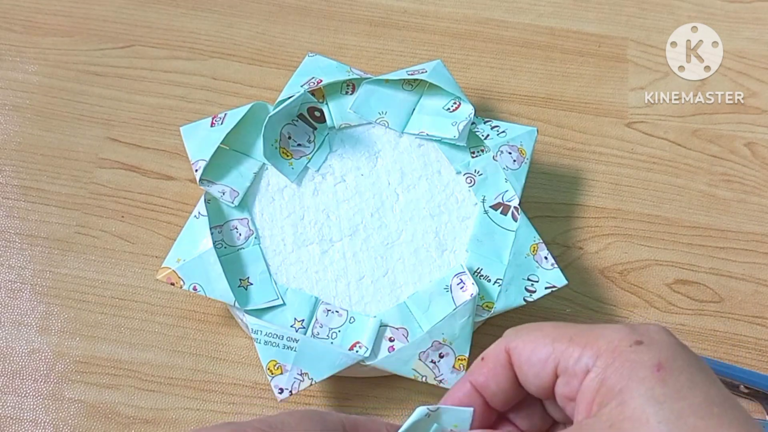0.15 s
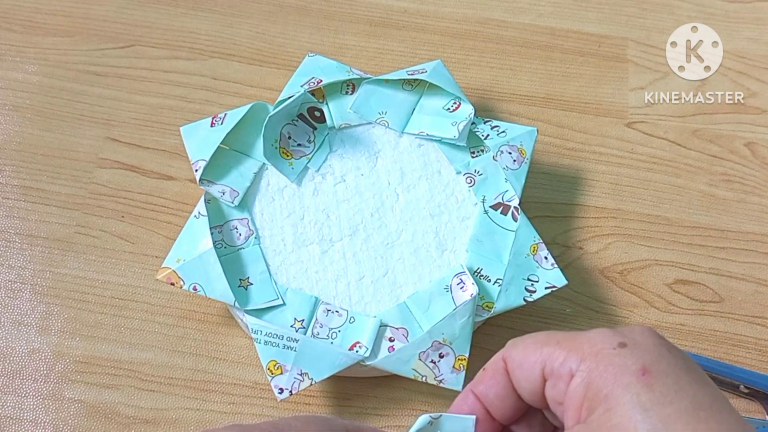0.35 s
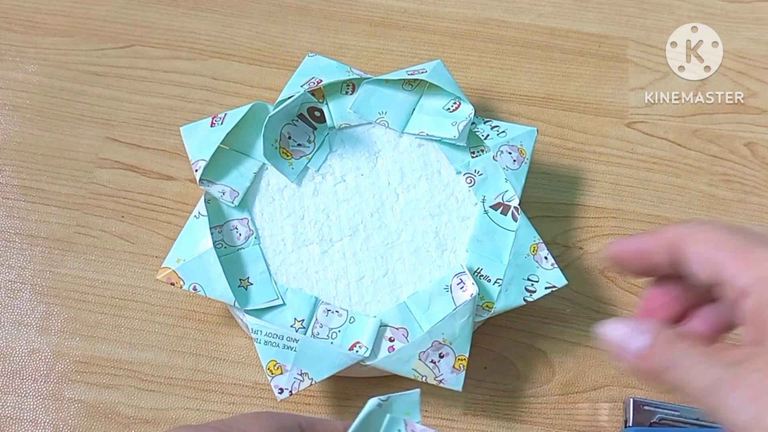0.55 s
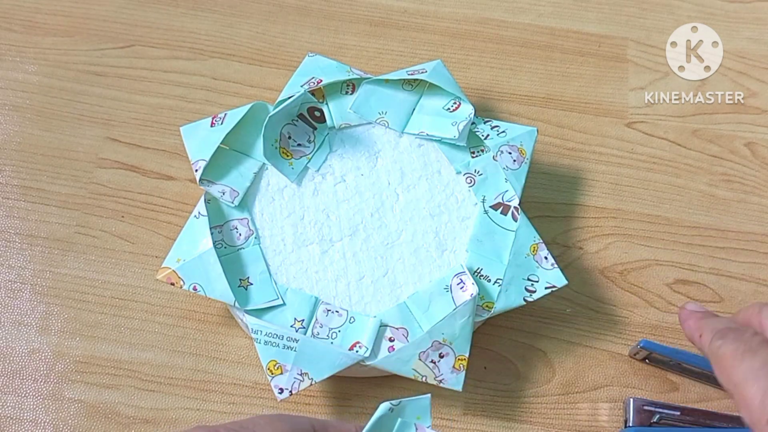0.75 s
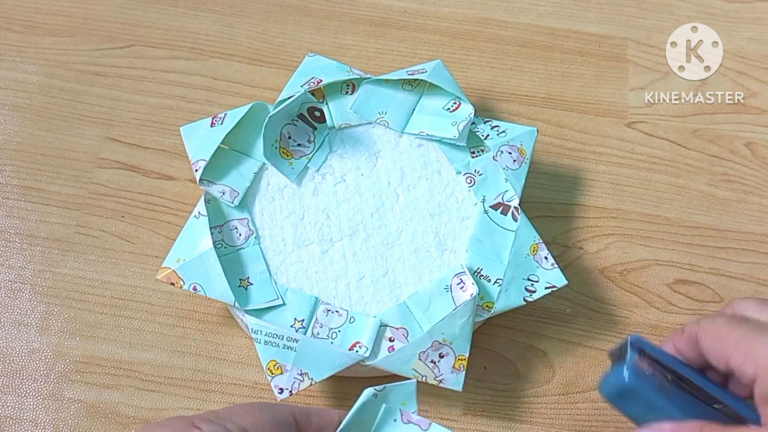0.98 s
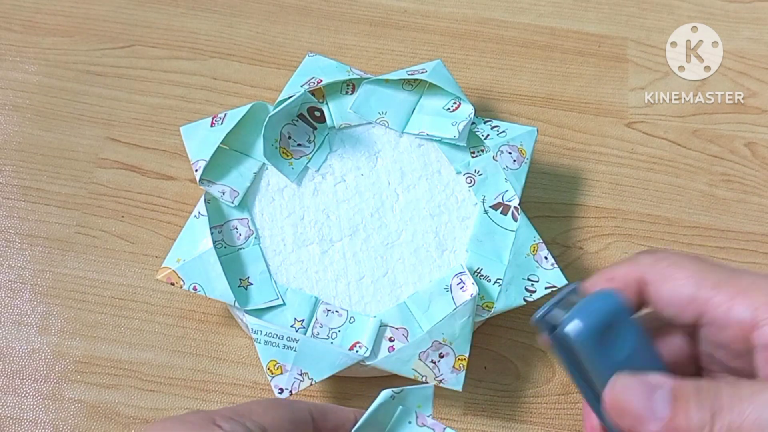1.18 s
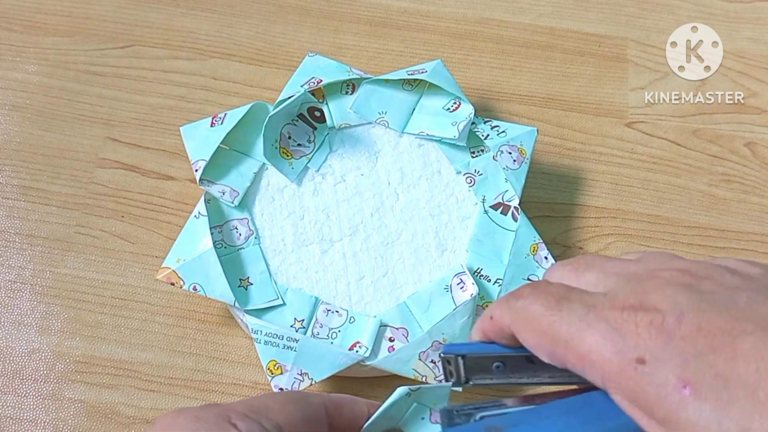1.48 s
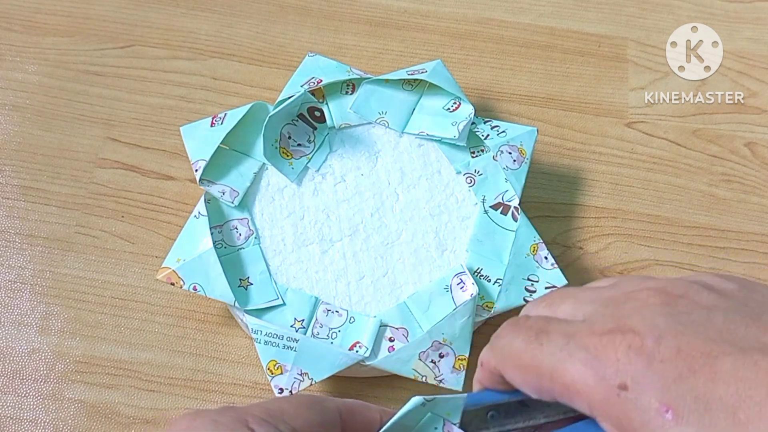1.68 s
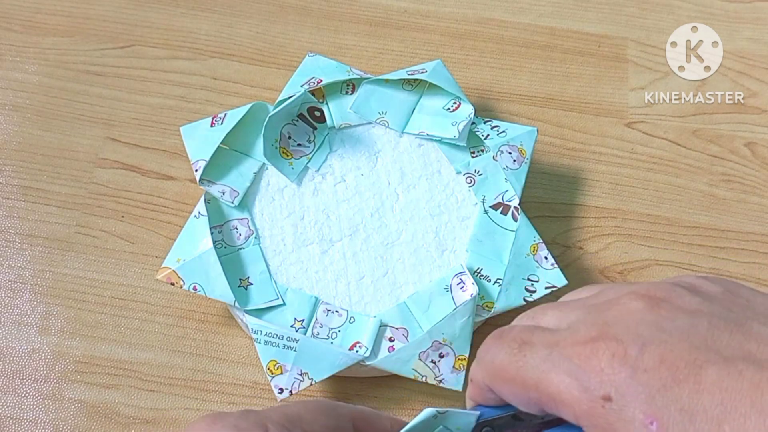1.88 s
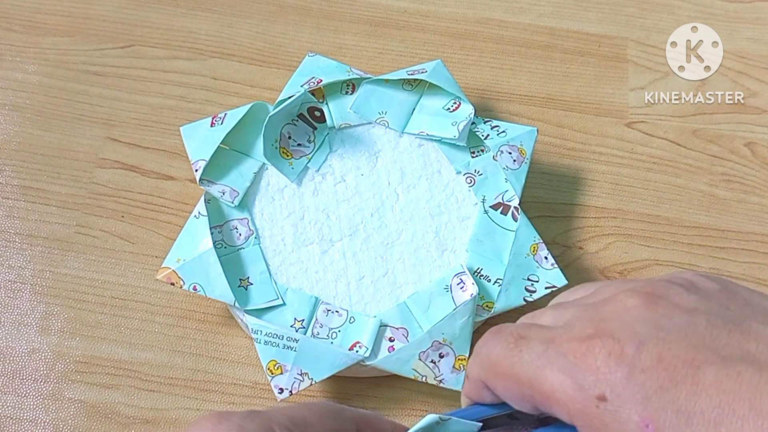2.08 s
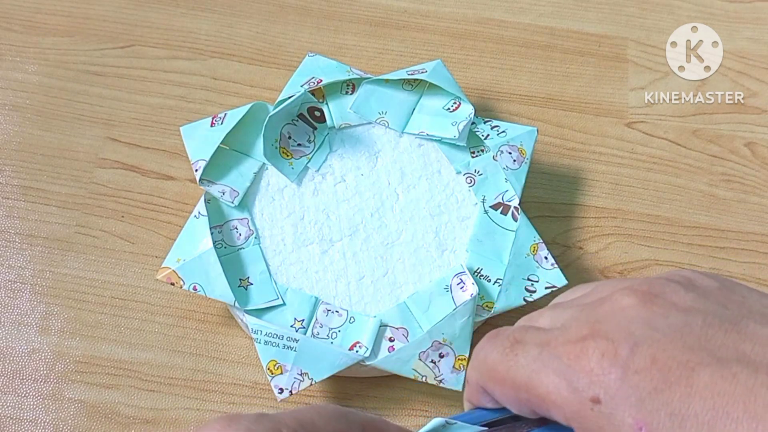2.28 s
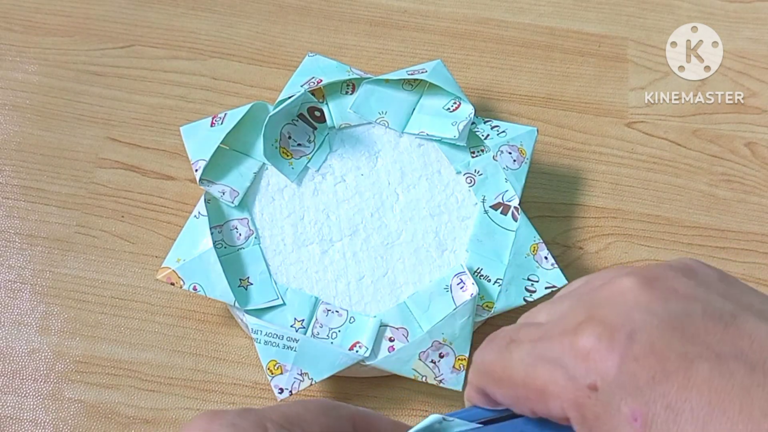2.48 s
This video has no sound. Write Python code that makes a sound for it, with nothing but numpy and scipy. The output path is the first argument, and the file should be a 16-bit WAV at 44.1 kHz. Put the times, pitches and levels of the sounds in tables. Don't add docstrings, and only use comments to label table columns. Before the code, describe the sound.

Stapler press and release, close and sharp, late in the scene; before it, light knocks, a brief paper rustle and sliding paper; afterwards small ticks, over low hum and faint hiss in a reverberant room.

```python
import sys
import numpy as np
from scipy import signal
from scipy.fft import rfft, irfft
from scipy.io import wavfile
from scipy.ndimage import uniform_filter1d

SR = 44100
rng = np.random.default_rng(int(sys.argv[2]) if len(sys.argv) > 2 else 0)


def attenuation_scalar(level_db):
    decades = np.asarray(level_db, float) / 20
    return 10 ** decades


def output_pcm(signal):
    pcm = np.clip(np.atleast_2d(signal).T, -1, 1) * 32767
    wavfile.write(sys.argv[1], SR, np.round(pcm).astype(np.int16))


N = 116865
EDGE_HZ = 15600


def evened(x):
    return x / np.sqrt(np.mean(x ** 2) + 1e-20)


def slow_noise(n, width):
    once = uniform_filter1d(rng.standard_normal(n), size=width)
    return evened(uniform_filter1d(once, size=width))


def read(points, hz):
    f, value = np.transpose(points)
    return np.interp(np.log(hz + 1), np.log(f + 1), value)


def level(points):
    s, db = np.transpose(points)
    after = db[-1] if s[-1] > 2.6 else -140
    return attenuation_scalar(np.interp(np.arange(N) / SR, s, db, left=-140, right=after))


def add(mix, s, sound):
    part = mix[..., round(s * SR):][..., :sound.shape[-1]]
    part += sound[..., :part.shape[-1]]


def colour(x, db_of):
    gain_db = np.maximum(db_of(np.fft.rfftfreq(4096, 1 / SR)), -100)
    cepstrum = irfft(np.log(attenuation_scalar(gain_db)))
    cepstrum[1:2048] *= 2
    cepstrum[2049:] = 0
    response = irfft(np.exp(rfft(cepstrum)))[:2048]
    return signal.oaconvolve(x, response)[:len(x)]


def resonate(x, peaks):
    total = 0
    for k, (hz, width, db) in enumerate(peaks):
        total = total + (-1) ** k * attenuation_scalar(db) * signal.lfilter(*signal.iirpeak(hz, hz / width, SR), x)
    return total


def burst(shape):
    x = rng.standard_normal(len(shape)) * shape
    for _ in range(4):
        z = rfft(x)
        x = irfft(z / abs(z), len(x))
        x = x * shape / np.sqrt(uniform_filter1d(x ** 2, size=25) + 1e-20)
    return x


def direct_and_room(sound, db, room_db, far=None):
    send = sound if far is None else far
    return np.array([sound, send]) / abs(sound).max() * attenuation_scalar([[db], [db + room_db]])


def snap(s, db, length, rise, room_db, modes, spectrum):
    t = np.arange(2000) / SR
    fade = attenuation_scalar(-60 * np.maximum(t - length, 0) / 0.014)
    rattle = burst(np.minimum(t / rise, 1) * fade)
    crack = evened(colour(rattle, lambda hz: read(spectrum, hz)))
    body = evened(resonate(rattle, modes))
    return s - rise / 2, direct_and_room(body + attenuation_scalar(-8) * crack, db, room_db, crack + attenuation_scalar(1) * body)


# (time [s], peak level [dB], rattle length [s], rise [s], room level [dB])
SNAPS = [
    (1.9895, -1, 0.0043, 0.00017, -7),
    (2.2445, -5.5, 0.0012, 0.00074, -13),
]
# (frequency [Hz], width [Hz], level [dB])
PRESS_MODES = [(580, 140, -13.5), (715, 100, -4), (2020, 275, 2.5), (3171, 77, 5.5), (4345, 180, -1.5),
               (5330, 310, 3), (6430, 860, -6.5), (8655, 440, 5), (10610, 760, 4), (10650, 250, -4.5)]
# (frequency [Hz], width [Hz], level [dB])
RELEASE_MODES = [(928, 110, -9), (1664, 330, -8.5), (2436, 105, 5), (3294, 187, 1), (3716, 270, -3),
                 (4100, 140, 0.5), (5620, 240, -5.5), (6250, 230, -1.5), (9350, 1200, -4),
                 (10700, 1170, -1.5)]
# (frequency [Hz], level [dB])
PRESS_CRACK = [(250, -41.5), (400, -13), (700, -1.5), (1310, -36), (1990, -0.5), (3500, 0), (10200, -10),
               (15500, -7)]
# (frequency [Hz], level [dB])
RELEASE_CRACK = [(500, -65), (740, -35.5), (980, -17), (2100, -15), (3500, 5.5), (4700, -18), (5600, 1.5),
                 (10500, -12), (15500, -5.5)]


def snaps(mix):
    add(mix, *snap(*SNAPS[0], PRESS_MODES, PRESS_CRACK))
    add(mix, *snap(*SNAPS[1], RELEASE_MODES, RELEASE_CRACK))


# (frequency [Hz], level [dB])
FIZZ = [(400, -47), (1150, -28), (1500, -10.5), (2400, -9.5), (2840, -11.5), (7400, -10.5), (10400, -6.5),
        (16000, -17.5)]


def click(s, db, hz, fizz_db, room_db, t60, hump_db, tilt_db):
    t = np.arange(2000) / SR
    pair = np.sin(2 * np.pi * hz * t) + 0.3 * np.sin(2 * np.pi * 1.2 * hz * t)
    onset = np.sin(np.pi / 2 * np.minimum(t / (0.096 * t60), 1)) ** 2
    ring = pair * attenuation_scalar(-60 * t / t60) * onset

    def fizz_colour(f):
        hump = hump_db * np.exp(-(np.log((f + 1) / hz) / 0.5) ** 2)
        return read(FIZZ, f) + tilt_db * np.log2(f / 2000 + .1) + hump

    puff = burst(attenuation_scalar(-60 * t / min(0.029, 1.3 * t60)) * np.minimum(t / 0.00029, 1))
    far = colour(puff, fizz_colour)
    patches_hz = np.geomspace(2000, 14500, 11) * rng.uniform(.93, 1.07, 11)
    fizz = 0.1 * far + resonate(far, [(f, 300, 5) for f in patches_hz])
    fizz_sound = attenuation_scalar(fizz_db) * direct_and_room(fizz, db, room_db, far + .25 * fizz)
    return s, fizz_sound + direct_and_room(ring, db, room_db - 11)


# (time [s], peak level [dB], shell tone [Hz], fizz level [dB], room level [dB])
KNOCKS = [(0.3854, -37.5, 1890, -0.5, -10.5), (0.386, -45.5, 5540, -12, -13),
          (0.4249, -33.5, 1690, -5.5, 2.5), (0.4369, -31.5, 1803, 1.5, -20.5), (0.657, -41, 2080, 1, -7.5),
          (0.7701, -50, 3110, -30, 11), (0.7708, -52.5, 2200, -26, 12), (.791, -45, 2440, -18, -7),
          (0.7947, -44.5, 1777, 5, -8), (0.9022, -41, 1737, -9.5, -7), (0.9112, -54, 3440, -1, 2),
          (0.996, -65, 1820, 8, 0), (1.008, -61, 1830, -2, 7), (1.036, -63.5, 2700, 4, -1.5),
          (1.8444, -50, 1760, -5, 4), (1.8683, -48, 1600, 4.5, -22), (1.917, -45, 1770, 4.5, -17),
          (2.1988, -37, 1870, 0, 0.5), (2.245, -20, 1825, -28, -27), (2.5086, -43.5, 1690, -7.5, -4)]


def knocks(mix):
    for row in KNOCKS:
        add(mix, *click(*row, t60=0.02, hump_db=6, tilt_db=-2.5))


# (time [s], peak level [dB], ring tone [Hz], fizz level [dB], room level [dB])
TICKS = [(0.026, -61, 5120, -5, 11.5), (.522, -54.5, 5400, 14.5, -26), (0.5325, -44.5, 3590, 17.5, 4.5),
         (.533, -33, 11170, 7, 8), (0.562, -30, 10600, -8, -23), (0.6557, -36.5, 10500, 9, -11.5),
         (0.4395, -41.5, 10800, 7.5, -8.5), (0.6637, -47, 10070, 19, -25), (0.669, -49, 7200, 12, -17),
         (.788, -43, 8700, 16, -14), (.792, -40, 10170, 12.5, -13), (.9035, -41.5, 8570, -7, -9),
         (.9036, -47, 10700, -0.5, -16), (1.0237, -53.5, 10630, -5, -10), (1.025, -55.5, 8800, -2.5, -4),
         (1.037, -67, 10700, 3, -10), (1.038, -60, 8800, -7, -8), (1.191, -65.5, 11900, 7, -17),
         (1.869, -46.5, 5430, -2, -23), (1.919, -51, 7030, 13.5, -14), (1.2533, -57, 14560, 2, -9),
         (1.3752, -28.5, 8800, -10.5, -7), (1.376, -34.5, 9700, -9, -25), (1.8445, -43.5, 4100, 1, -4.5),
         (2.2294, -44.5, 5800, 12, -1), (2.352, -39, 11000, -10, -30), (2.412, -55.5, 7550, 6.5, -14.5),
         (2.509, -43, 8630, -8, -25), (2.514, -44, 8700, -7, -24), (2.553, -62, 7080, -9, -14),
         (2.587, -45, 10830, -3, -29)]


def ticks(mix):
    for row in TICKS:
        add(mix, *click(*row, t60=0.012, hump_db=12, tilt_db=0))


# (time [s], peak level [dB], tone [Hz], fizz level [dB], room level [dB])
TAPS = [
    (2.581, -44.5, 2450, -5, 1),
    (2.5871, -51.5, 4940, -1, -2),
    (2.6008, -50, 2440, -2, -4),
    (2.612, -52, 2300, -9, -6),
]


def taps(mix):
    for row in TAPS:
        add(mix, *click(*row, t60=0.0071, hump_db=0, tilt_db=-11))


def tone(s, db, hz, t60):
    t = np.arange(round(t60 * SR)) / SR
    waver = 1 + min(hz / 4000, 1.2) * slow_noise(SR, 130)[:len(t)]
    envelope = attenuation_scalar(-60 * t / t60) * np.minimum(t / (.12 * t60), 1)
    return s, direct_and_room(np.sin(2 * np.pi * hz * t) * waver * envelope, db, -13)


# (time [s], peak level [dB], tone [Hz], t60 [s])
RINGS = [
    (.791, -60.5, 5760, 0.69),
    (.945, -65.5, 4380, 0.31),
    (1.024, -62, 4310, 0.079),
    (1.376, -51, 5120, 0.04),
    (1.377, -76, 2250, 1),
    (2.014, -21.5, 6430, 0.043),
    (2.514, -56, 8750, 0.063),
    (2.611, -58, 10830, .08),
]


def rings(mix):
    for row in RINGS:
        add(mix, *tone(*row))


# (time [s], peak level [dB], tone [Hz], t60 [s])
THUDS = [(.42, -43, 805.6, 0.065), (.533, -48.5, 932, 0.026), (.534, -48, 1185, 0.041),
         (.534, -56, 2100, 0.045), (1.35, -54.5, 147, 0.078), (.437, -45.5, 808, .045),
         (.525, -64, 35, 0.11), (.69, -58.5, 99.5, 0.21), (1.25, -59.5, 82, 0.15), (1.865, -55, 810, 0.048),
         (1.98, -58.5, 35, 0.058), (2.3, -59.5, 140, 0.23)]


def thuds(mix):
    for row in THUDS:
        add(mix, *tone(*row))


# (time [s], level [dB])
SLIDES = [
    [(.8, -83), (.84, -64.5), (.97, -73)],
    [(1.52, -90), (1.6, -71), (1.69, -60.5), (1.85, -58.5), (1.97, -66)],
]
# (frequency [Hz], width [Hz], level [dB], loudest at [s], lasts [s])
JAWS = [(1029, 37, -5, 1.1, 2.8), (1690, 70, -12.5, 1.55, 0.45), (3010, 72, -21, 1.75, 0.17),
        (4450, 96, -18, 1.74, 0.11), (5046, 46, -13, 1.72, 0.085), (5740, 85, -11.5, 1.65, .05),
        (6115, 24, -12, 1.64, 0.15)]


def sliding():
    t, whistle = np.arange(N) / SR, 0
    for hz, width, db, centre, lasts in JAWS:
        waver_db = 3.5 * slow_noise(N, 900)
        rubbing = resonate(rng.standard_normal(N), [(hz, 3 * width, 0)])
        line = evened(resonate(rubbing, [(hz, 2.3 * width, 0)]))
        whistle = whistle + line * attenuation_scalar(db + waver_db) * np.exp(-((t - centre) / lasts) ** 2)
    return whistle * sum(uniform_filter1d(level(stroke), 800) for stroke in SLIDES)


# (time [s], level [dB])
RUSTLE = [(0, -60.5), (.06, -74.5), (.42, -72), (.445, -45.5), (.5, -64.5), (.53, -68), (.93, -77.5),
          (1.0, -72), (1.08, -72.5), (1.85, -71), (1.95, -65), (2.57, -70.5), (2.59, -70), (2.65, -63)]


def rustle():
    size = attenuation_scalar(-2 * np.minimum(rng.exponential(1, N), 3))
    happens = rng.random(N) < 9000 / SR
    grains = size * happens * rng.standard_normal(N)
    return evened(colour(grains, lambda hz: read(FIZZ, hz))) * level(RUSTLE)


# (frequency [Hz], t60 [s])
ROOM = [(300, 0.19), (790, 0.4), (2090, 0.41), (5510, 0.49), (14600, 0.32)]


def room(x):
    t = np.arange(SR) / SR
    early, build_s = .6, .025
    slap = .4 * np.exp(-((t - .028) / .005) ** 2)
    shape = early + (1 - early) * np.minimum(t / build_s, 1) + slap
    hz, frames, z = signal.stft(rng.standard_normal(SR), SR, nperseg=256)
    z = z * attenuation_scalar(-60 * frames / read(ROOM, hz)[:, None])
    tail = signal.istft(z, SR, nperseg=256)[1][:SR] * shape * (t > .003)
    return signal.fftconvolve(x, tail / np.linalg.norm(tail))[:N]


def gated(x):
    hz, _, z = signal.stft(x, SR, nperseg=512)
    power = uniform_filter1d(uniform_filter1d(abs(z) ** 2, size=9, axis=0), size=3, axis=1)
    kept = z * power / (power + attenuation_scalar(2 * -89.5))
    return signal.istft(kept * (hz < EDGE_HZ)[:, None], SR, nperseg=512)[1][:N]


# (frequency [Hz], width [Hz], level [dB])
MIC = [(7910, 1000, -3.5), (13500, 1100, -5.5), (10500, 2600, -3), (14560, 720, 9)]


def microphone(x):
    def port(f):
        bumps = sum(db * np.exp(-((f - hz) / width) ** 2) for hz, width, db in MIC)
        return bumps - 26.5 * (f > EDGE_HZ)
    return colour(x, port)


# (frequency [Hz], level [dB])
HUM = [(15, -42.5), (28, -27.5), (48, -10.5), (75, -9.5), (134, 3.5), (216, -3.5), (261, -9), (447, -24.5),
       (500, -15), (650, -33.5), (1100, -120)]
# (frequency [Hz], level [dB])
HISS = [(400, -3.5), (1070, -5), (1880, -12.5), (4000, -14), (7500, -21.5), (10300, -32), (12500, -26.5),
        (15600, -29.5)]


def background():
    def steady(points):
        hz = np.fft.rfftfreq(N, 1 / SR)
        inside = (hz > points[0][0]) * (hz < points[-1][0])
        return evened(irfft(rfft(rng.standard_normal(N)) * attenuation_scalar(read(points, hz)) * inside, N))

    hum = steady(HUM) * attenuation_scalar(-69 + 0.5 * slow_noise(N, 6000))
    hiss = steady(HISS) * attenuation_scalar(-77)
    since = np.arange(N) / SR - np.array(SNAPS)[:, :1]
    recovery = (np.exp(-abs(since) / 0.95) * (since > 0)).max(0)
    duck = attenuation_scalar(-6.5 * uniform_filter1d(recovery, size=900))
    return duck * (hum + hiss)


def scene():
    mix = np.zeros((2, N))
    for source in (snaps, knocks, taps, ticks, thuds, rings):
        source(mix)
    direct, send = mix
    near = direct + gated(room(send) + sliding() + rustle())
    return (microphone(near) + background())[None]


def band_limit(x):
    return signal.sosfilt(signal.butter(12, 16800, fs=SR, output="sos"), x)


def record(dry):
    return band_limit(dry)


dry = scene()
out = record(dry)
output_pcm(out)
```